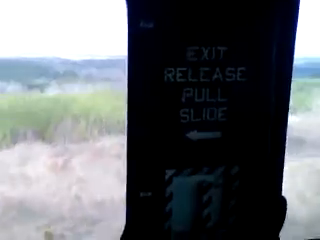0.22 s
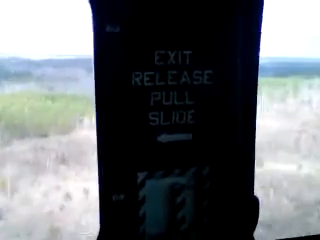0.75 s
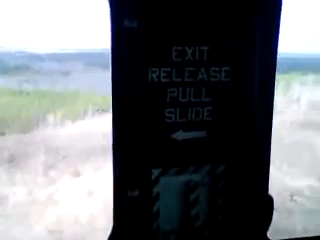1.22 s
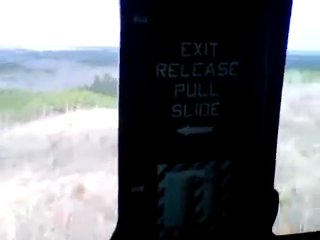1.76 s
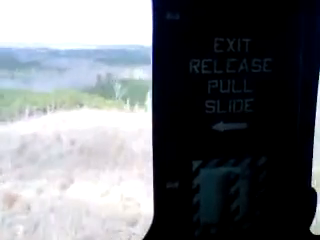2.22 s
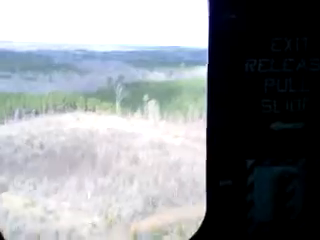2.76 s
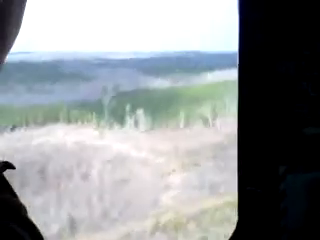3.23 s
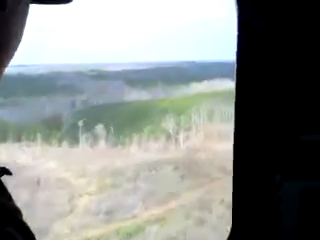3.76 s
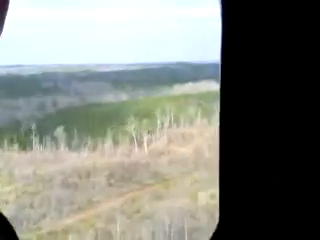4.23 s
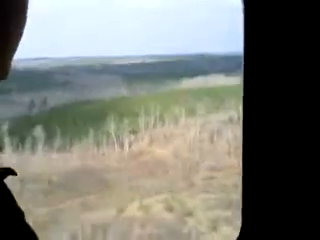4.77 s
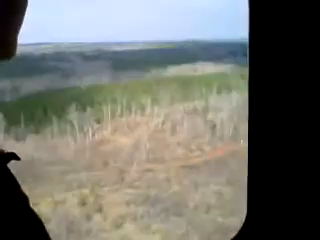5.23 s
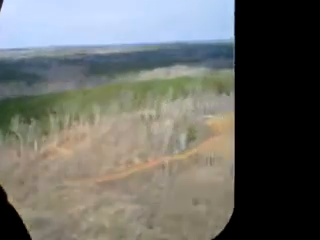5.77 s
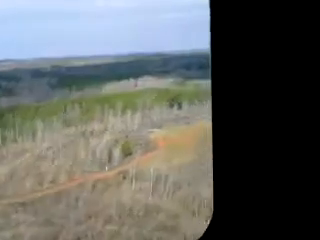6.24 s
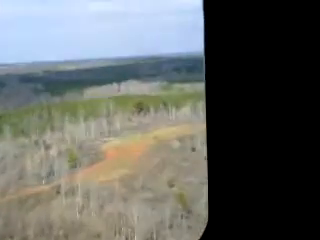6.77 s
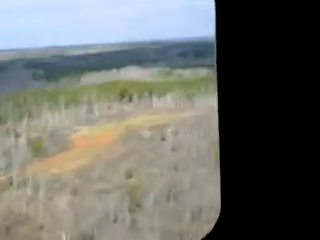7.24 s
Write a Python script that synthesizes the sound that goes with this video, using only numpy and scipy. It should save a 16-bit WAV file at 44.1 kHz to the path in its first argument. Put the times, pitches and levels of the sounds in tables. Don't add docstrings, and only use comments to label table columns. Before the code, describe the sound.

Continuous loud helicopter cabin drone with booming hull, pulsing blades, rushing air and a thin shaky turbine whistle, gritty and clipped throughout.

```python
import sys
import numpy as np
from scipy import signal
from scipy.fft import rfft, irfft, next_fast_len
from scipy.io import wavfile
from scipy.ndimage import uniform_filter1d, map_coordinates

SR = 44100
rng = np.random.default_rng(int(sys.argv[2]) if len(sys.argv) > 2 else 0)


def field_ratio(decibels):
    return 10 ** (np.asarray(decibels, dtype=float) / 20)


def int16_out(signal):
    q = np.round(np.clip(np.atleast_2d(signal).T, -1, 1) * 32767)
    wavfile.write(sys.argv[1], SR, q.astype(np.int16))


N = 331191
MESH_HZ, BLADE_HZ = 1650.5, 10.787
CAMERA_SR, FRAME, GRID, EDGE_HZ = 16000, 1024, 528, 7255


def unit(x):
    return x / np.sqrt(np.mean(x ** 2) + 1e-20)


def along(points, hz):
    f, v = np.transpose(points)
    return np.interp(np.log(hz + 1), np.log(f + 1), v)


def curves(rows):
    s, *cols = np.transpose(rows)
    return [np.interp(np.arange(N) / SR, s, c) for c in cols]


def bumps(rows, width_s):
    coarse = np.arange(0, N + 64, 64)
    total_db = sum(db * np.exp(-.5 * ((coarse / SR - s) / width_s) ** 2) for s, db in rows)
    return np.interp(np.arange(N), coarse, total_db)


def wobble(rate):
    coarse = np.arange(0, N + 64, 64)
    knots = rng.standard_normal(int(N * rate / SR) + 4)
    return np.interp(np.arange(N), coarse, map_coordinates(knots, [coarse * rate / SR]))


def filtered(x, response):
    m = next_fast_len(N + SR // 2)
    return irfft(rfft(x, m) * response(np.fft.rfftfreq(m, 1 / SR)), m)[..., :N]


def noise(response):
    return unit(filtered(rng.standard_normal(N), response))


# (time [s], frequency [Hz])
SHAFT_SPEED = [(0, 1651.2), (1.2, 1652.2), (1.9, 1651.6), (2.4, 1649.3), (3.7, 1651), (4.3, 1648.7),
               (5, 1649.6), (6.1, 1651.6), (6.9, 1650), (7.6, 1649.2)]


def turns():
    return np.cumsum(curves(SHAFT_SPEED)[0] / MESH_HZ) / SR


# (frequency [Hz], level [dB per Hz])
BOOM_SPECTRUM = [(5, -17.5), (30, -7.5), (72, -12.5), (90, -5), (130, -4), (170, -4), (205, 0.5), (243, -8),
                 (268, -1.5), (290, -10), (315, -9), (470, -16.5), (900, -24), (2000, -120)]
# (frequency [Hz], level [dB per Hz])
AIR_SPECTRUM = [(100, -39), (380, -4.5), (490, -7), (524, 2), (550, -5.5), (680, -4), (850, -6),
                (1500, -10), (3000, -10), (3700, -15.5), (4400, -17.5), (7000, -24), (9000, -29)]
# (time [s], level over usual [dB])
BANKING_AIRFLOW = [
    (0, 0),
    (.2, 0.5),
    (1.1, 1.5),
    (2.2, -0.5),
    (2.6, 0),
    (4.1, -1),
    (4.5, 1),
    (5.9, 0),
    (7.5, .5),
]
# (time [s], level [dB])
BOOM_SWELLS = [(.3, -0.5), (1.69, 1.5), (2.2, 1.5), (2.75, -1), (2.97, 2), (3.88, -2.5), (4.08, 0.5),
               (4.35, -1.5), (5.27, 2), (5.4, -2.5), (5.6, 0.6), (6.03, -1), (6.14, 0), (6.35, 0.5),
               (6.82, -0.5), (7.2, -1)]
# (time [s], level [dB])
HULL_GUSTS = [(.45, -3.5), (1.3, -2), (1.45, 3.5), (2.75, 3.5), (2.98, 4.5), (3.1, -5), (3.62, 3.5),
              (4.29, 4), (4.82, -2.5), (5.2, 3.5), (6.15, -1)]
# (time [s], level [dB])
DOOR_PUFFS = [
    (2.2, -2),
    (2.55, 1.5),
    (3.1, 2),
    (3.85, 3),
    (4.1, 2),
    (4.4, 2),
    (5.6, -2),
    (6.1, 3),
    (7.2, 2),
]
SWELL_S = .045


def cabin():
    wake = np.cos(2 * np.pi * BLADE_HZ * turns() + 1.1)
    buffet_db = -34.5 + bumps(HULL_GUSTS, width_s=.07) + 1.5 * wobble(7)
    buffet = field_ratio(buffet_db) * noise(lambda hz: field_ratio(along(BOOM_SPECTRUM, hz)) * (hz < 85))
    boom_db = -26 + bumps(BOOM_SWELLS, SWELL_S) + .8 * wobble(4) + 0.51 * wake
    boom = field_ratio(boom_db) * noise(lambda hz: field_ratio(along(BOOM_SPECTRUM, hz)) * (hz >= 85))
    air_db = -33 + .4 * curves(BANKING_AIRFLOW)[0] + bumps(DOOR_PUFFS, width_s=.04)
    air_db = air_db + 1.3 * wobble(14) + 1.2 * wake
    air = field_ratio(air_db) * noise(lambda hz: field_ratio(along(AIR_SPECTRUM, hz)))
    return buffet + boom + air


# (time [s], level over usual [dB])
TURBINE_EFFORT = [(0, 1.5), (.2, 1.5), (.52, -1), (.95, 0.5), (2.2, -1.5), (2.38, 1.5), (3.5, 0.5),
                  (3.92, 2.5), (4.1, -3), (4.33, 1), (4.45, -1.5), (4.97, 7.5), (5.06, 1), (5.8, -1),
                  (6.74, 0), (6.83, 3), (7.09, -1), (7.2, 1.5)]
# (time [s], level [dB])
WHISTLE_FLARES = [(.04, 2.5), (.4, 5), (1.32, 5.5), (1.5, -2.5), (2.4, 5.5), (2.65, 1), (3.85, -2.5),
                  (4.78, 2.5), (5.4, -2.5), (5.95, -3.5), (6.92, 5)]


def turbine(whistle_hz=4015, width_hz=60, drift_hz=45):
    tone_hz = whistle_hz + drift_hz * wobble(120)
    tone = np.sqrt(2) * np.sin(2 * np.pi * np.cumsum(tone_hz) / SR)
    fuzz = noise(lambda hz: 1 / (1 + ((hz - whistle_hz) / width_hz) ** 2))
    level_db = -46.5 + 0.7 * curves(TURBINE_EFFORT)[0] + bumps(WHISTLE_FLARES, width_s=.05) + 0.64 * wobble(13)
    return field_ratio(level_db) * (tone + .55 * fuzz)


GEAR_HZ = [26.9, 55.37, 107.9, 110.76, 138.8, 220.1, 300.0, 502.16, 637.1, 647.85, 658.63, 1004.3, 1661.3,
           1876, 1933.6, 2000.6, 3192]
GEAR_DB = [-51, -42, -45, -38, -40.5, -45, -49, -40, -51, -42.5, -46.5, -48.5, -58, -60, -57, -61, -52.5]
# (time [s], level [dB rms])
TOP_MESH = [
    (0, -44.5),
    (1, -41.5),
    (2, -44.5),
    (2.5, -43.5),
    (3.3, -49),
    (4.5, -50),
    (5.5, -47),
    (6.2, -45),
    (6.7, -49),
    (7.5, -44.5),
]


def gears():
    shaft = 2 * np.pi * turns()
    tones = np.zeros(N)
    for hz, db in zip(GEAR_HZ, GEAR_DB):
        level = field_ratio(db + 1.2 * wobble(1.3))
        tones += level * np.sin(hz * shaft + .25 * wobble(2))
    top_mesh = field_ratio(curves(TOP_MESH)[0]) * np.sin(MESH_HZ * shaft)
    return np.sqrt(2) * (tones + top_mesh)


# (level [dB rms], phase [rad])
BLADE_HARMONICS = [
    (-42.5, .5),
    (-46, 1.1),
    (-44, 1.3),
    (-37, .1),
]


def rotor():
    blade = 2 * np.pi * BLADE_HZ * turns()
    thump = np.zeros(N)
    for order, (db, lead) in enumerate(BLADE_HARMONICS, 1):
        thump += field_ratio(db + 1.5 * wobble(1.5)) * np.cos(order * blade + lead)
    return np.sqrt(2) * thump


def scene():
    return (cabin() + turbine() + gears() + rotor())[None]


def levelled(x, lo_hz, hi_hz, level_db, size=4096):
    band = filtered(x, lambda hz: (hz >= lo_hz) & (hz < hi_hz))
    running_rms = np.sqrt(np.abs(uniform_filter1d(band ** 2, size)))
    return x + band * (field_ratio(level_db) / running_rms - 1)


# (frequency [Hz], step [dB])
STEP_SIZE = [(50, -8), (400, -5), (1000, -2), (4000, 1.5), (4600, 6), (6800, 7.3), (7200, 5)]
# (time [s], length [s], lowest frequency lost [Hz], step rise [dB])
STARVED_BLOCKS = [(0.426, .008, 5000, 7.5), (1.69, .01, 3500, 4.5), (4.102, .006, 4300, 4),
                  (4.603, .008, 4000, 8), (5.214, 0.0052, 2500, 6), (5.278, .02, 5500, 10.5),
                  (5.453, 0.0068, 3000, 6.5), (5.5, .008, 4560, 5.5), (5.54, .008, 5000, 10),
                  (6.79, 0.0054, 4200, 4), (7.118, 0.017, 4200, 11), (7.226, .01, 4200, 16),
                  (7.24, .006, 4200, 8), (7.328, .012, 2500, 6.5)]
# (frequency [Hz], share [0-1])
GRAIN_SHARE = [(300, .01), (2500, .06), (3800, .1), (4600, .3), (7000, .35)]


def quantised(x, size, count, scatter_db, extra_db, follow):
    n, k = np.arange(2 * size), np.arange(size)
    window = np.sin(np.pi * (n + .5) / (2 * size))
    basis = window[:, None] * np.cos(np.pi / size * np.outer(n + .5 + size / 2, k + .5))
    padding = (2 * FRAME - GRID, GRID + FRAME - len(x) % FRAME)
    halves = np.pad(x, padding).reshape(-1, size)
    bins = np.hstack([halves[:-1], halves[1:]]) @ basis
    hz = (k + .5) * CAMERA_SR / (2 * size)
    power = np.abs(uniform_filter1d(bins ** 2, 4 * count, axis=1))
    share = np.clip(along(GRAIN_SHARE, hz), 0, 1)
    bins = np.sqrt(1 - share) * bins + np.sqrt(share * power) * rng.standard_normal(bins.shape)
    level = np.sqrt(power ** follow * power.mean(axis=0) ** (1 - follow))
    chance = np.repeat(rng.standard_normal((len(bins), size // count)), count, axis=1)
    step_db = along(STEP_SIZE, hz) + extra_db + scatter_db * chance
    if size < FRAME:
        centre = (np.arange(len(bins))[:, None] * size + size - 2 * FRAME + GRID) / CAMERA_SR
        ragged = np.clip(1 + 0.44 * chance, 0, 2)
        for s, length, lowest_hz, rise_db in STARVED_BLOCKS:
            near = np.abs(centre - s) < length / 2 + .002
            step_db = step_db + rise_db * near * (hz > lowest_hz) * ragged
    step = level * field_ratio(step_db) + 1e-9
    bins = np.sign(bins) * np.floor(np.abs(bins) / step + .42) * step
    bins = bins * (hz < EDGE_HZ + CAMERA_SR / (2 * size))
    blocks = bins @ basis.T * 2 / size
    overlapped = (blocks[1:, :size] + blocks[:-1, size:]).ravel()
    return overlapped[2 * FRAME - GRID - size:][:len(x)]


# (time [s], peak level [dB])
BLOCK_BLIPS = [(0.4389, -61), (0.5028, -63), (1.719, -63), (4.151, -58), (4.5989, -63), (4.6628, -55),
               (5.239, -50), (5.3028, -55), (5.3667, -61), (5.4306, -52), (5.4949, -53), (5.5583, -55),
               (6.0706, -62), (6.8389, -57), (7.1586, -60), (7.223, -50), (7.2868, -52), (7.3507, -52)]
# (frequency [Hz], gain [dB])
MIRROR_LEAK = [(7300, 0), (8000, 0), (8400, -6), (8700, -26), (9000, -37), (9150, -46), (9300, -70)]


def camera_blocks(x):
    low = signal.resample_poly(x, 160, 441)
    t = np.arange(len(low)) / CAMERA_SR
    short, blips = np.zeros(len(low)), np.zeros(len(low))
    for s, db in BLOCK_BLIPS:
        short = np.maximum(short, np.clip((.042 - np.abs(t - s + .022)) / .008, 0, 1))
        blips += field_ratio(db - 3.5) * np.sin(np.pi * np.clip((t - s + .003) / 0.012, 0, 1)) ** 2
    long_blocks = quantised(low, size=1024, count=8, scatter_db=2.01, extra_db=-0.1, follow=.4)
    short_blocks = quantised(low, size=128, count=4, scatter_db=2.5, extra_db=-3.5, follow=0.83)
    half_rate = np.cos(np.pi * np.arange(len(low)))
    low = long_blocks + short * (short_blocks - long_blocks) + blips * half_rate
    up = signal.resample_poly(np.kron(low, [2, 0]), 441, 320)[:N]
    return filtered(up, lambda hz: field_ratio(along(MIRROR_LEAK, hz)) * (hz < 9300))


def band_limit(x):
    return signal.sosfilt(signal.butter(12, 9200, fs=SR, output="sos"), x)


# (time [s], rasp level [dB])
PANEL_RATTLES = [(.178, 3), (1.70, -4), (1.73, 2), (1.97, 3), (3.96, 2), (4.105, -5), (4.12, 6), (4.62, 3),
                 (5.38, 2.5), (5.46, -5.5), (5.765, -1), (6.025, 7), (6.785, -3), (6.81, 7.5), (7.22, 4),
                 (7.31, 1.5), (7.33, -6), (7.345, 4.5)]


def record(dry):
    hot = field_ratio(6.5) * dry[0]
    clipped = hot / (1 + np.abs(hot / 0.079) ** 6) ** (1 / 6)
    effort_db = curves(TURBINE_EFFORT)[0]
    swell_db = bumps(BOOM_SWELLS, SWELL_S)
    rattle_db = bumps(PANEL_RATTLES, width_s=0.0062)
    rasp_db = -36 + curves(BANKING_AIRFLOW)[0] + 0.19 * effort_db - swell_db + rattle_db
    hiss_db = -45 + effort_db - .6 * swell_db + .5 * rattle_db
    raspy = levelled(clipped, 1500, 4400, rasp_db)
    hissy = levelled(raspy, 4220, 7300, hiss_db)
    mix = camera_blocks(hissy)[None] + .0007
    return band_limit(mix)


dry = scene()
out = record(dry)
int16_out(out)
```